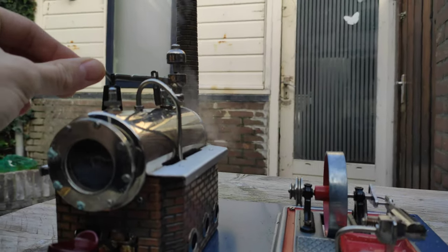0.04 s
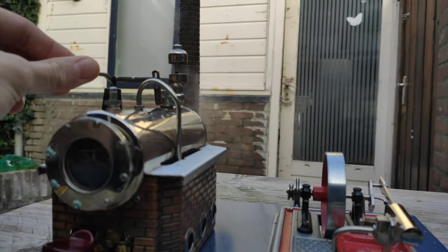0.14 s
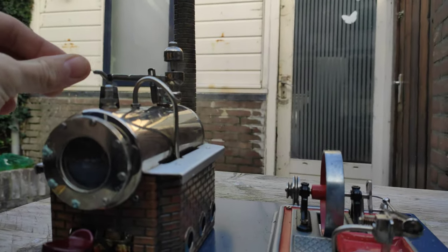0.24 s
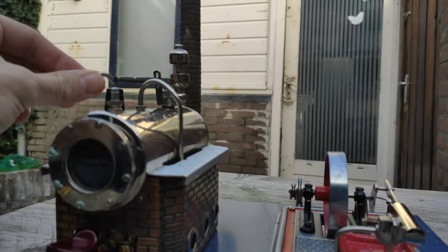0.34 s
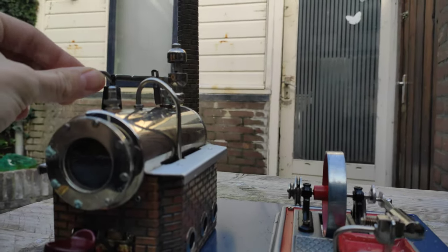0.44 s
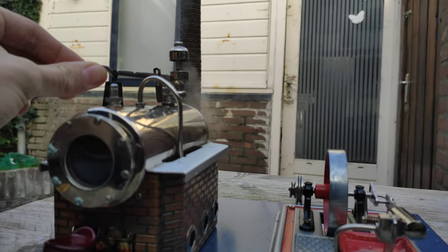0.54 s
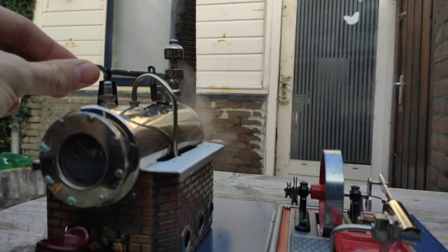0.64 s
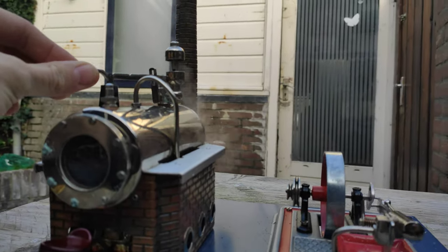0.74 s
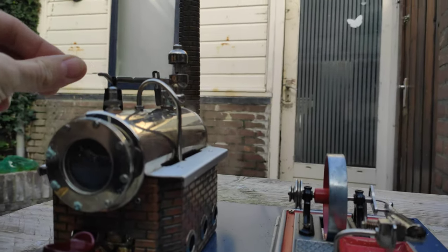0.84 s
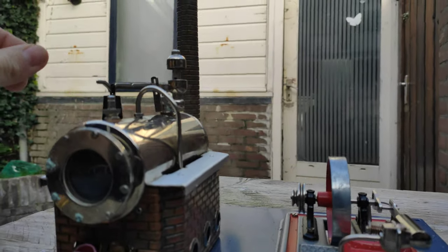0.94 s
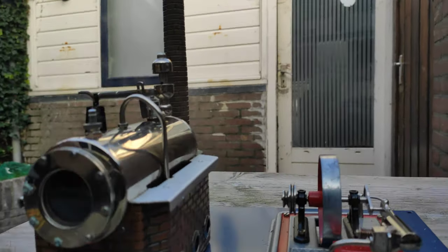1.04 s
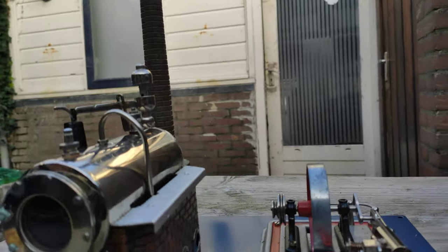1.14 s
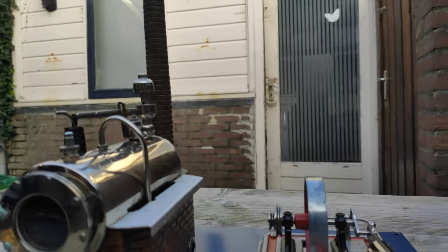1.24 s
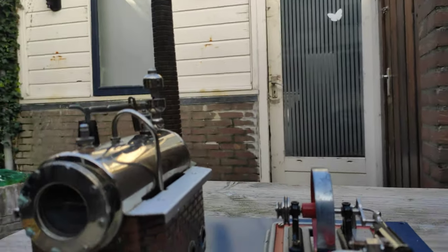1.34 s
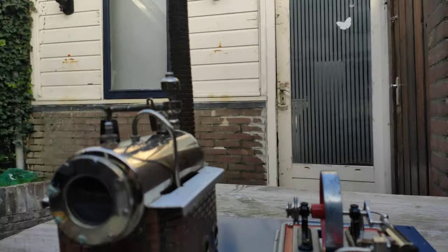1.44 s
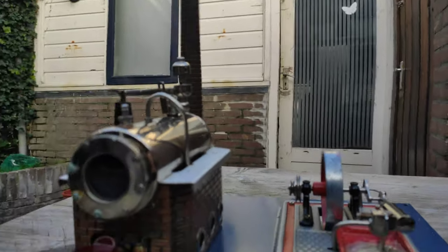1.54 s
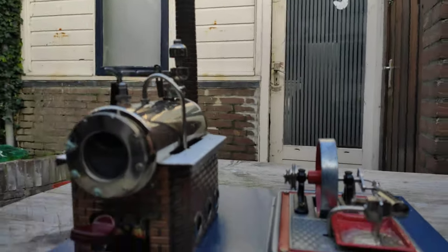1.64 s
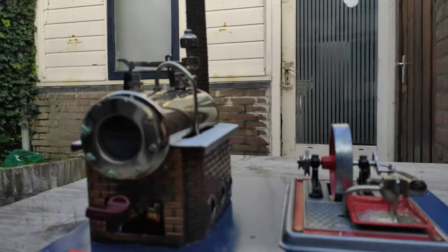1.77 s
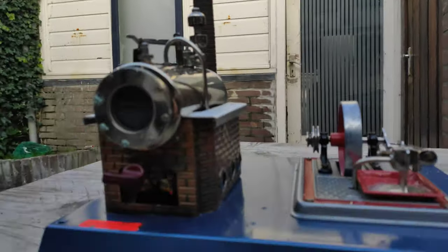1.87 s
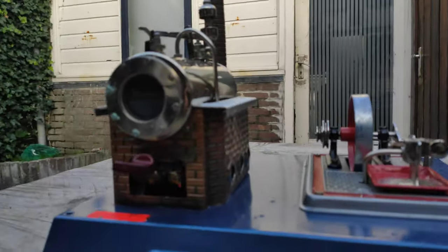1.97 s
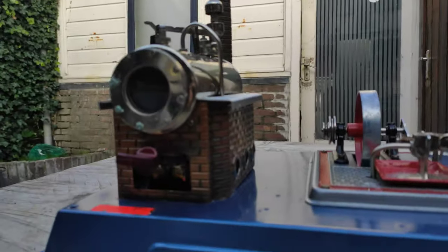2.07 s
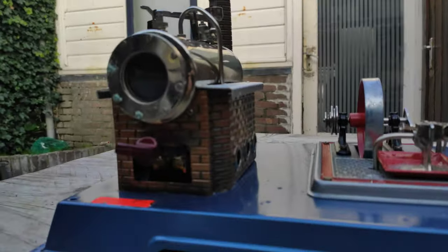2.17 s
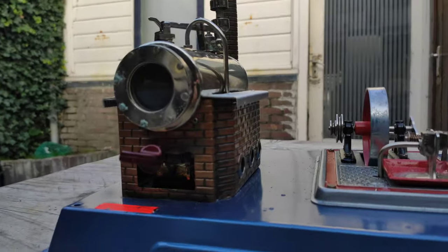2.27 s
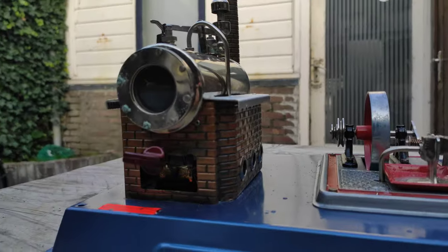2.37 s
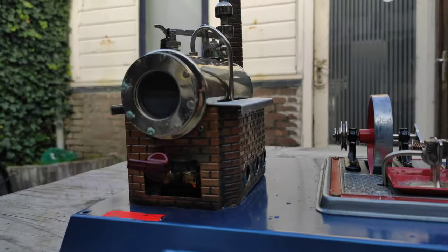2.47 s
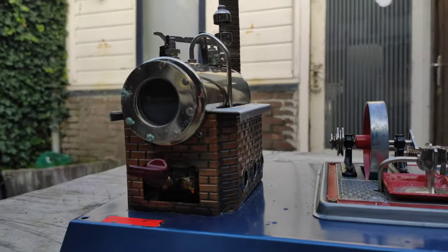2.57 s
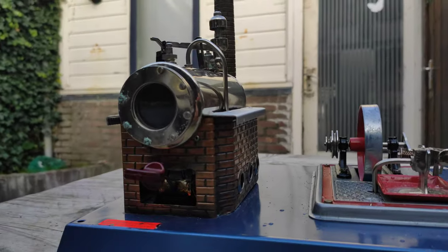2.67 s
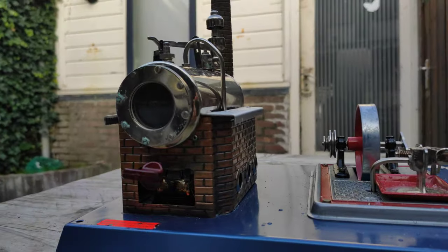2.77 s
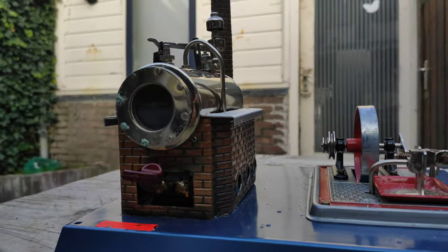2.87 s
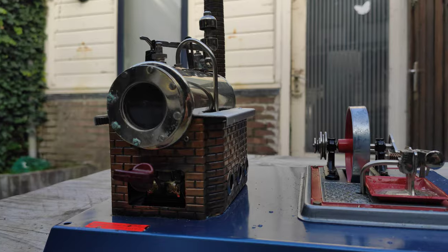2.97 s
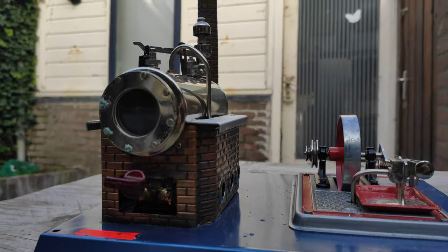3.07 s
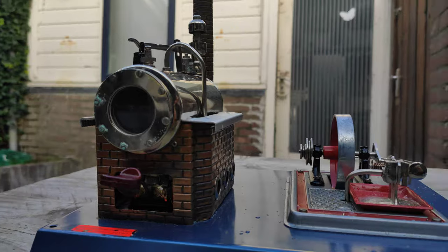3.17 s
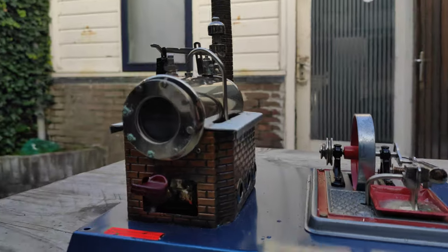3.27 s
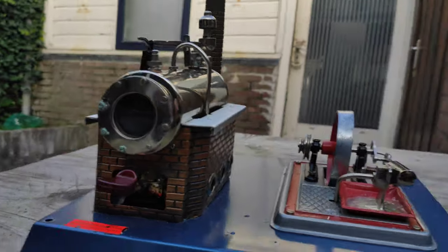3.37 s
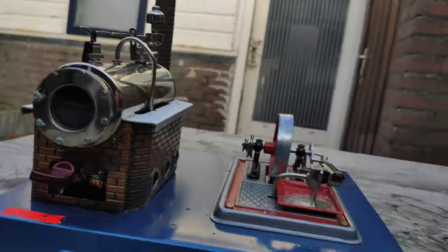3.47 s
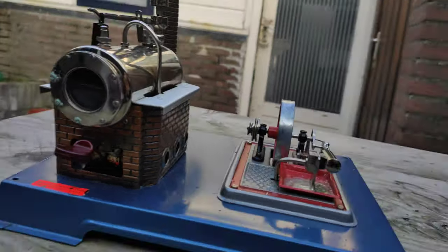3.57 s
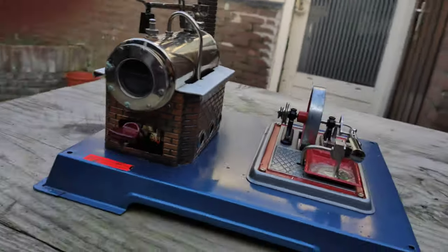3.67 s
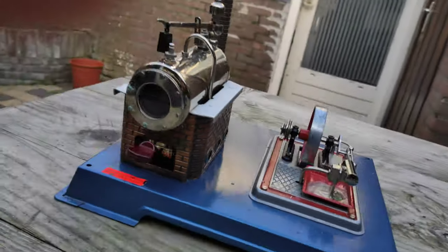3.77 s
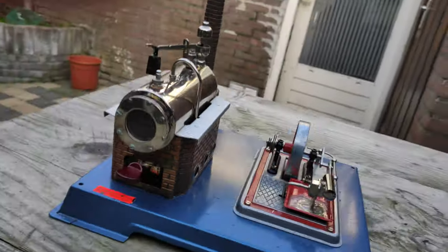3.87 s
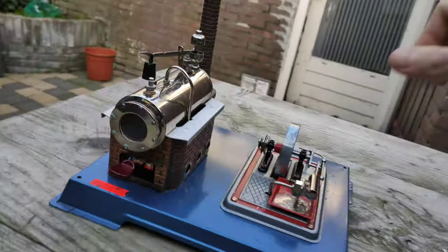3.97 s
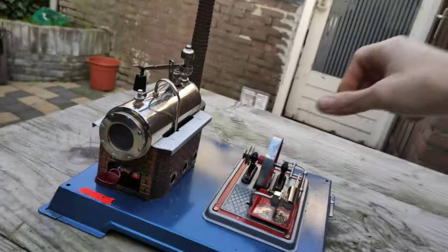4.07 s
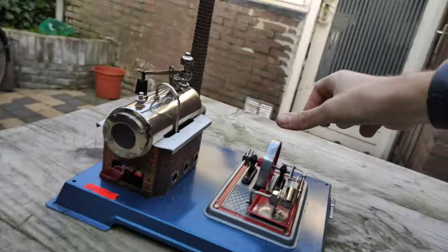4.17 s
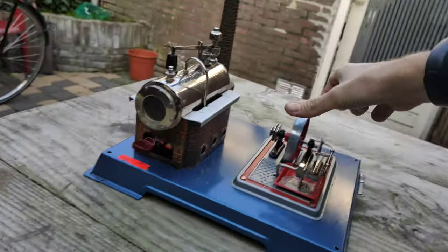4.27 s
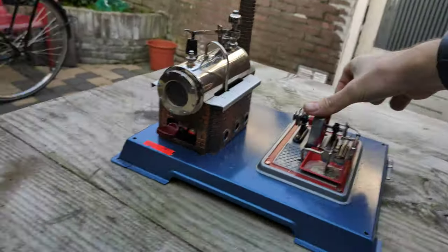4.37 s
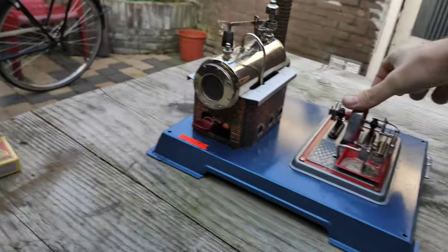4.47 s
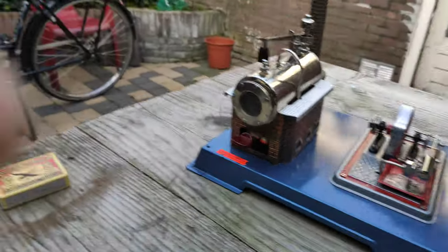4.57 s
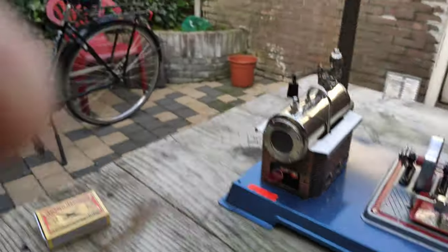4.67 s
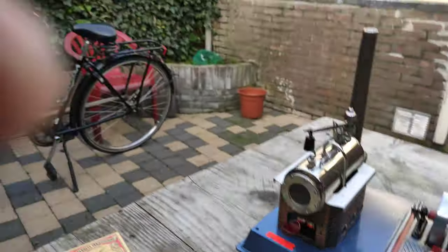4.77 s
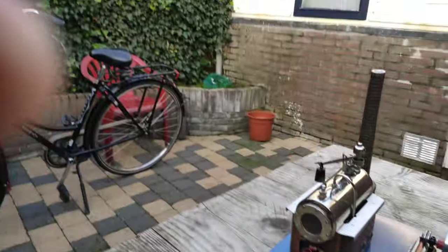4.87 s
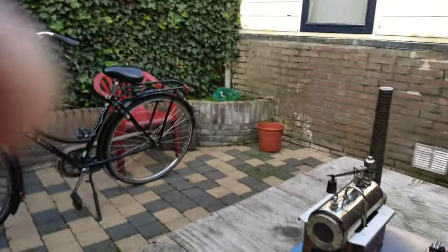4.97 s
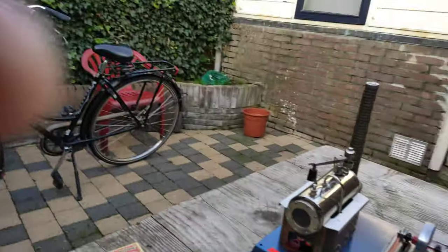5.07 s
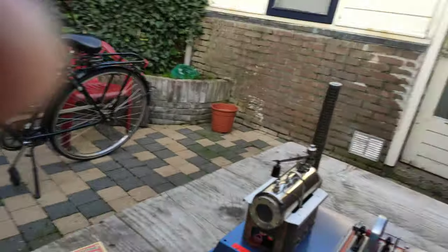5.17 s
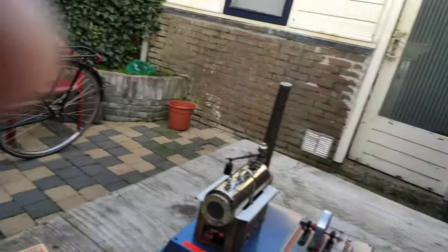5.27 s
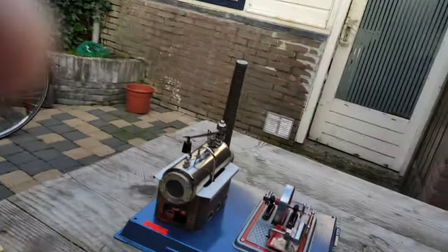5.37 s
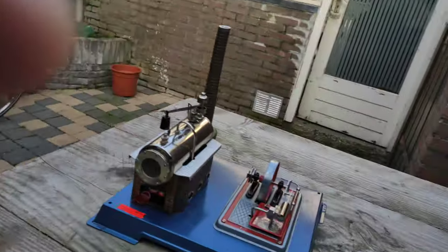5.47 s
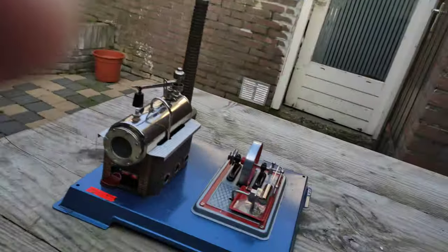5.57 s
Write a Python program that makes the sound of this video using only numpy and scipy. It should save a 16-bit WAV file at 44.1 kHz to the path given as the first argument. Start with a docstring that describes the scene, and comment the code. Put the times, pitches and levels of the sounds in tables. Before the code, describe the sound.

A model steam engine gives two short, high, hissy whistle toots and a faint third while its knocking crank runs down. A lull follows with faint seeping steam, low wind, a distant town and light taps. Fingers briefly rub the hand-held stereo microphone. Then the engine restarts, with quick tinny knocks, valve ticks and spits of steam, echoing slightly in a walled yard.

```python
"""A model steam engine on a garden table in a walled yard, heard by a hand-held stereo microphone.
First a finger pulls the steam whistle twice, then once faintly, while the crank runs down. In the lull,
seeping steam, wind, a distant town and light taps remain. After about 3 s, fingers rub the microphone.
Near 4.4 s the flywheel is flicked, and each turn gives a valve tick, a spit of steam and a knock that
rings the tin base plate."""
import sys
import numpy as np
from scipy import signal
from scipy.fft import rfft, irfft, next_fast_len
from scipy.io import wavfile
from scipy.ndimage import uniform_filter1d

SR = 44100
rng = np.random.default_rng(int(sys.argv[2]) if len(sys.argv) > 2 else 0)


def file_out(sig):
    """Save sig as 16-bit WAV at sys.argv[1]."""
    # one column per channel
    cols = np.atleast_2d(sig).T
    # limit, then scale
    lim = np.clip(cols, -1, 1)
    pcm = np.round(lim * 32767).astype(np.int16)
    wavfile.write(sys.argv[1], SR, pcm)


N = 247401

# "Pan" is left level minus right level. "Fade" is the time taken to fall by 60 dB.
# valve ticks: (time [s], strength [dB])
VALVE_TICKS = [(0.326, -22.5), (0.9016, -25.5), (4.658, -28), (4.7371, -42), (4.762, -26), (4.8645, -38),
               (4.871, -29), (4.9866, -26), (5.0294, -44), (5.1086, -29), (5.239, -25.5), (5.378, -27),
               (5.5263, -31)]
# ringing tones of the valve, base plate and table: (pitch [Hz], level [dB], fade [s])
VALVE_TONES = [(5130, -12.5, .012), (6300, -4, .01), (8500, -2.5, 0.027), (11100, -15.5, 0.013),
               (12660, -12, 0.0087)]
PLATE_TONES = [(365, -5, .11), (450, -9, .06), (555, -4, .12), (663, -4, .07), (750, -2, .1),
               (840, -4, .06), (1040, -7, .06), (1174, -1, .16), (1343, -7, .09), (1505, -9, .06),
               (1745, -5, .05), (1890, -7, .05), (2150, -9, .06), (2330, -11, .06), (2570, -11, .06)]
TABLE_TONES = [(105.5, -1.5, 0.38), (187, -2.5, 0.15), (209.5, -5, 0.22)]
# spits of exhaust steam: (time [s], level [dB], length [s])
STEAM_SPITS = [(0.335, -41, 0.019), (4.55, -42.5, 0.02), (4.663, -36, 0.017), (4.7665, -36.5, 0.023),
               (4.877, -37, 0.014), (4.9905, -38.5, 0.02), (5.1134, -38.5, 0.012), (5.2443, -39, 0.024),
               (5.383, -41, 0.019), (5.53, -37.5, 0.015)]
# crank knocks: (time [s], strength [dB], sharp crack above that [dB])
CRANK_KNOCKS = [(0.094, -33, -9), (0.118, -25.5, -1), (0.36, -25, -1.5), (0.623, -24, -3),
                (0.771, -32.5, -7), (0.917, -42, 0.5), (1.068, -40.5, 0), (4.414, -40, -32),
                (4.568, -26, -10.5), (4.622, -38, -10.5), (4.671, -23.5, -15), (4.734, -44, -14),
                (4.776, -22.5, -13), (4.887, -23.5, -6.5), (5.003, -24, -6.5), (5.126, -25, -3.5),
                (5.257, -24, -6.5), (5.396, -24, -8.5), (5.545, -25, -6)]
# the steam jet, one list for each whistle pull: (time [s], level [dB])
WHISTLE_PULLS = [
    [(0.0, -23.5), (0.014, -28), (0.08, -26.5), (0.1, -29.5), (0.138, -36.5), (0.156, -41.5), (0.2, -86)],
    [(0.47, -57.5), (0.494, -36.5), (0.54, -28), (0.59, -25.5), (0.64, -25.5), (0.68, -31.5), (0.74, -36),
     (0.764, -45), (0.81, -91)],
    [(0.91, -67), (0.932, -40), (0.948, -44), (1.008, -43.5), (1.04, -64)],
]
# each pull's two tones: (start [s], low pitch [Hz], low tone [dB], high tone [dB]), against a full jet
PULL_TONES = [(0, 3680, 2.5, -3), (.3, 3763, 2, -3), (.87, 3730, -23, -23)]
# the whistle's low tone, then its high tone: (width [Hz], delay on the left [radians])
PIPE_TONES = [(380, 2), (1150, 0.43)]
# moments when the low tone sounds clearly: (time [s], level [dB], length [s])
CLEAR_MOMENTS = [(.001, -13.5, 0.0072), (0.045, -12.5, 0.0077), (0.074, -19.5, 0.011), (0.077, -22, 0.014),
                 (0.577, -13.5, 0.012), (0.586, -13.5, 0.011), (0.619, -11.5, 0.0048), (0.629, -19.5, .01),
                 (0.642, -9.5, .004)]
# skin on the microphone or flywheel: (time [s], rise [s], fade starts after [s], fade [s],
# level on the nearer side [dB], rumble above that [dB], treble above that [dB], pan [dB])
SKIN_RUBS = [(3.173, .004, .005, 0.28, -54, 3, -5, -5), (3.232, 0.0044, 0.0054, .06, -44.5, 9.5, -14, -16),
             (3.25, 0.012, 0.051, 0.052, -46, 6, -7, -26), (3.334, 0.011, 0.02, 0.2, -45, 6, -16, -25),
             (3.387, .013, 0.026, 0.069, -22.5, -3.5, -2.5, -38),
             (3.424, 0.0077, 0.015, .1, -46, -18, 11, -20), (3.44, 0.011, 0.053, 0.093, -53, -10, 11, -15),
             (3.685, .008, 0.033, 0.13, -51.5, -5, 3.5, 10), (3.758, .006, 0.0067, 0.24, -58.5, 4, -2, 0),
             (4.269, .003, .084, 0.12, -63.5, 4, -17, 0.5)]
# taps nearby: (time [s], level [dB], pitch [Hz], pan [dB], push above the tail [dB])
LIGHT_TAPS = [(1.068, -43.5, 1760, 8, 10), (1.572, -42.5, 281, 2, -13.5), (2.07, -59, 2180, 9, -6),
              (2.43, -52, 1047, -2, -6), (3.176, -60, 7100, -8, -6), (3.271, -42, 700, -27, 13),
              (3.286, -48, 5000, -15, 0), (3.687, -52.5, 900, 5, 9), (3.995, -46.5, 700, 1, 7),
              (4.279, -55.5, 2500, -8, 2), (4.294, -55, 2200, -5, -6), (4.312, -53, 1970, -8, -6),
              (4.632, -54, 1490, 0, 0), (4.72, -56, 4000, 2, 0), (5.029, -45, 3880, 8, 3)]
# steam seeping from the fittings: (time [s], level [dB], lower hiss above that [dB])
SEEP_LEVELS = [(0, -63, -9), (.85, -61.5, -14), (1.05, -66.5, -4), (1.1, -59.5, -4), (1.3, -63, -7),
               (1.62, -64, -1.5), (1.7, -61.5, 1.5), (1.98, -60, -2), (2.1, -62.5, -6), (2.65, -67, -1),
               (3.15, -65.5, -4.5), (3.64, -61, -5), (3.8, -78, -9), (4.1, -68, -0.5), (4.59, -70, -0.5),
               (5.18, -59.5, -3.5), (5.61, -67.5, -1)]
# whistling pinholes: (pitch [Hz], width [Hz], level against the seeping [dB])
PINHOLES = [(4260, 400, -18.5), (6970, 500, -10), (7830, 250, -18), (12000, 600, -11.5), (14600, 900, -9.5)]
# wind on the microphone: (time [s], level [dB], pan [dB])
GUSTS = [(0.0, -57, -1), (0.15, -46.5, 1), (0.69, -51, 1.5), (1.42, -54.5, -1), (1.61, -48, 0),
         (2.05, -52, -6), (2.31, -49, 3.5), (2.53, -54, -5.5), (3.14, -52.5, 7), (3.25, -45.5, -22.5),
         (3.41, -45.5, 0), (3.59, -48.5, 6), (3.75, -41, 2.5), (4.05, -43.5, 1), (4.23, -51.5, 1.5),
         (4.73, -47, 4), (5.05, -54, 2), (5.61, -52.5, 4)]
# the distant town: (time [s], level [dB])
TOWN_SWELLS = [(0.0, -41.5), (0.25, -53.5), (0.61, -49.5), (1.31, -58), (1.61, -54.5), (4.08, -56.5),
               (4.92, -52.5), (5.61, -52)]
# distant machines: (pitch [Hz], width [Hz], level against the town [dB])
MACHINE_HUMS = [(655, 50, -18), (1020, 90, -19.5)]
# how each noise is spread from bass to treble: (frequency [Hz], level [dB])
SPIT_SPECTRUM = [(290, -13), (500, 1.5), (1960, -8), (3600, -6.5), (5100, -1.5), (5980, -7), (7020, -1.5),
                 (9940, -15), (11800, -11.5), (13100, -8), (16000, -2.5)]
CLATTER_SPECTRUM = [(150, -29), (250, -6.5), (1100, 0), (1500, -5), (1790, 0), (2620, -15), (2810, -12.5),
                    (4910, -13), (5450, -25.5), (8280, -19), (9690, -41), (14000, -86.5), (16000, -19)]
JET_SPECTRUM = [(1500, -38), (2500, -44), (3100, -22), (4500, -20.5), (5600, -10), (6800, -19), (8100, -12),
                (9300, -19.5), (11000, -14.5), (12200, -15), (13300, -15), (14500, -4), (15600, -10.5),
                (16100, -14.5)]
SEEP_SPECTRUM = [(3710, -35), (6300, -1.5), (6870, -1), (8090, 4.5), (9730, -7.5), (11600, -1.5),
                 (13700, -4), (15100, 0), (16000, -4.5)]
TOWN_SPECTRUM = [(35, -27.5), (60, 0.5), (92, -2), (167, -5.5), (618, -19.5), (1000, -19.5), (1190, -21.5),
                 (1620, -23), (2720, -30.5), (4490, -41.5), (6000, -45), (7800, -61), (13200, -120)]

STEP_BACK_S, STEP_BACK_DB = 4, -2.5  # the microphone moves away and the highest treble drops
KNOCK_PAN_DB = 3, -1  # before and after that step
STEAM_PAN_DB, WHISTLE_PAN_DB = 4, 4
HIGH_TONE_HZ, RISE_HZ_PER_S = 4450, 4700
FULL_JET_DB, JET_DELAY_S, JET_ALIKE = -26.5, .00041, .17
YARD_FADE_S, YARD_DB, WHISTLE_ECHO_DB = .35, -16.5, -13
ALIKE_BELOW_HZ, TOP_HZ = 1108, 15760


def engine():
    """Valve, exhaust and crank together, a little duller once the microphone steps back."""
    sound = valve() + exhaust() + crank()
    treble = signal.sosfiltfilt(signal.butter(2, 13000, "highpass", fs=SR, output="sos"), sound)
    return sound + (undb(STEP_BACK_DB) - 1) * treble * (np.arange(N) > STEP_BACK_S * SR)


def crank():
    """Slack in the crank rattles shut, ringing the tin plate and the table."""
    times, db, crack_db = np.transpose(CRANK_KNOCKS)
    pan_db = np.where(times < STEP_BACK_S, *KNOCK_PAN_DB)
    blows = bursts(times, db, pan_db, rise_s=.0055, hold_s=.011, fade_s=.088)
    bounces = undb(4 * wander(600))
    bounces /= uniform_filter1d(bounces, size=500)  # small bounces share one blow
    plate = ring(blows * bounces * band(280, 4700, 1), PLATE_TONES) * undb(-49)
    table = ring(uniform_filter1d(blows, size=600) * band(94, 340, 1), TABLE_TONES) * undb(-63)
    clatter = blows * bounces * noise(CLATTER_SPECTRUM, .98) * undb(-8)
    cracks = bursts(times, db + crack_db, STEAM_PAN_DB, rise_s=.00053, hold_s=.0023, fade_s=.044)
    return plate + table + clatter + cracks * bounces * noise(SPIT_SPECTRUM, .071)


def valve():
    """Each tick is a tiny burst of noise that makes the valve ring."""
    times, db = np.transpose(VALVE_TICKS)
    ticks = bursts(times, db, STEAM_PAN_DB, rise_s=.0005, hold_s=.0025, fade_s=.006)
    ticks *= band(3500, 15000, .2)
    return ring(ticks, VALVE_TONES) * undb(-35.5) + ticks * undb(-15)


def exhaust():
    """The exhaust opens with a pop and spits out steam."""
    times, db, length = np.transpose(STEAM_SPITS)
    pops = bursts(times, db + 2, STEAM_PAN_DB, rise_s=.0015, hold_s=.003, fade_s=.025)
    spits = bursts(times, db, STEAM_PAN_DB, rise_s=.003, hold_s=length, fade_s=.0158)
    return (pops + spits) * undb(.79 * wander(370)) * noise(SPIT_SPECTRUM, 1)


def whistle():
    """A wet steam jet hisses and wakes two breathy tones in a pipe."""
    jet, = curves(WHISTLE_PULLS)
    starts, *settings = np.transpose(PULL_TONES)
    pull = np.searchsorted(starts * SR, np.arange(N), side="right").clip(1) - 1
    low_hz, low_db, high_db = (column[pull] for column in settings)
    # the low tone climbs to its pitch while the jet opens
    peak_s = np.array([max(rows, key=lambda row: row[1])[0] for rows in WHISTLE_PULLS])[pull]
    low_hz = low_hz - RISE_HZ_PER_S * np.clip(peak_s - np.arange(N) / SR, 0, .1)
    # the harder the jet blows, the more the low tone takes over
    force = np.maximum(jet / undb(FULL_JET_DB), .3)
    low = undb(low_db) * force * breathy(low_hz, *PIPE_TONES[0])
    high = undb(high_db) * force ** -.56 * breathy(HIGH_TONE_HZ, *PIPE_TONES[1])
    left, right = noise(JET_SPECTRUM, 0)
    left, right = high + [JET_ALIKE * right + np.sqrt(1 - JET_ALIKE ** 2) * left, right]
    hiss = np.array([np.roll(left, round(JET_DELAY_S * SR)), right])  # reaches the right side first
    times, db, length = np.transpose(CLEAR_MOMENTS)
    flares = bursts(times, db, 0, rise_s=.0055, hold_s=length, fade_s=.029)
    phase = 2 * np.pi * np.cumsum(low_hz + 60 * wander(79.8)) / SR
    clear = flares * np.sin(phase - np.array([[PIPE_TONES[0][1]], [0]]))
    return (jet * (low + hiss) + clear) * sides(WHISTLE_PAN_DB)[:, None]


def rubs():
    """Skin sticks and slips, making grainy noise that is often much louder on one side."""
    times, rise, hold, fade, db, rumble_db, treble_db, pan_db = np.transpose(SKIN_RUBS)

    def press(extra_db):
        return bursts(times, db + extra_db - abs(pan_db) / 2, pan_db, rise, hold, fade)

    grain = undb(2 * wander(300))
    scrape = noise([(1800, -29), (2800, -7), (5500, -1.5), (8200, -.5), (9200, -15.5), (10000, -36)], 0)
    rumble = noise([(60, -6), (200, 1), (2500, -15), (3000, -40)], 0)
    treble = noise([(8500, -14), (10000, -3.5), (13500, 1.5), (16200, -2.5)], 0)
    return grain * (press(0) * scrape + press(rumble_db) * rumble + press(treble_db) * treble)


def taps():
    """Each tap is a short push with a dull tail of noise."""
    out = np.zeros((2, N))
    length, fade_s = SR // 8, .084
    white = rng.standard_normal((2, length))
    white[1] += white[0]  # makes the sides partly alike
    for time, db, hz, pan_db, push_db in LIGHT_TAPS:
        tail = signal.lfilter(*signal.butter(2, [hz * .51, hz * 1.42], "bandpass", fs=SR), white)
        tap = unit(tail) * undb(-60 * np.arange(length) / SR / fade_s)
        push = np.hanning(int(.3 * SR / hz) + 3) ** 3
        tap[:, :len(push)] += undb(push_db) * push
        start = int(time * SR)
        out[:, start:start + length] += undb(db) * sides(pan_db)[:, None] * tap
    return out


def seeping_steam():
    """Steam hisses from the fittings and whistles unsteadily through pinholes."""
    level, lower_db = curves([SEEP_LEVELS])
    leaks = sum(undb(db + 5 * wander(5.1)) * breathy(hz * (1 + .025 * wander(3)), width, 1.7)
                for hz, width, db in PINHOLES)
    lower_hiss = noise([(2200, -22), (3200, -2), (4500, 1), (6000, -3.5), (6800, -20)], .11)
    return level * (noise(SEEP_SPECTRUM, .023) + undb(lower_db) * lower_hiss + leaks)


def wind():
    """Gusts rumble on the microphone's two openings."""
    gust, pan_db = curves([GUSTS])
    rumble = noise([(12, -2), (24, 13.5), (40, 12), (60, 2.5), (90, -11), (160, -35.5)], .4)
    return gust * sides(pan_db) * rumble


def town():
    """A distant town murmurs and its machines hum, both wavering."""
    hums = sum(undb(db + .83 * wander(9.5)) * breathy(hz, width, 0) for hz, width, db in MACHINE_HUMS)
    flicker = undb(wander(18))
    level, = curves([TOWN_SWELLS])
    return level * (noise(TOWN_SPECTRUM, .98) * flicker + hums)


def yard_echo(sound):
    """Brick walls send back a short, blurred echo."""
    t = np.arange(int(YARD_FADE_S * SR)) / SR
    tail = noise([(20, 2.5), (3000, -1.5), (20000, -13)], .9)[:, :len(t)]
    tail *= undb(-60 * t / YARD_FADE_S) * np.minimum(t / .0022, 1)
    tail /= np.sqrt(np.sum(tail ** 2, axis=1, keepdims=True))
    return signal.fftconvolve(sound, tail, axes=1)[:, :N]


def undb(db):
    """Turn decibels into a multiplier."""
    return 10 ** (np.asarray(db) / 20)


def unit(x):
    """Scale to an average power of 1."""
    return x / np.sqrt(np.mean(x ** 2))


def sides(pan_db):
    """Left and right multipliers."""
    return undb(np.array([pan_db, -pan_db]) / 2)


def noise(spectrum, alike):
    """Shaped stereo noise; alike (0 to 1) is how well the two sides match in the bass."""
    hz, db = np.transpose(spectrum)
    size = next_fast_len(N, True)
    freqs = np.maximum(np.arange(size // 2 + 1) * SR / size, 1)
    shape = undb(np.interp(np.log(freqs), np.log(hz), db))
    mid, side = rfft(rng.standard_normal((2, size))) * shape
    match = alike / (1 + (freqs / ALIKE_BELOW_HZ) ** 2)
    mid, side = mid * np.sqrt(1 + match), side * np.sqrt(1 - match)
    return unit(irfft(np.array([mid + side, mid - side]), size)[:, :N])


def band(low_hz, high_hz, alike):
    """Noise mostly between two frequencies."""
    return noise([(low_hz * .75, -30), (low_hz, 0), (high_hz, 0), (high_hz * 1.25, -30)], alike)


def breathy(hz, width_hz, left_lag):
    """A tone driven by noise: the wider, the breathier."""
    pole = np.exp(-np.pi * width_hz / SR)
    drive = rng.standard_normal(N) + 1j * rng.standard_normal(N)
    sway = signal.lfilter([1], np.convolve([1, -pole], [1, -pole]), drive)
    tone = sway * np.exp(2j * np.pi * np.cumsum(hz + np.zeros(N)) / SR)
    return unit(np.array([(tone * np.exp(-1j * left_lag)).real, tone.real]))


def ring(drive, tones):
    """Shake an object so that its tones ring and fade."""
    out = 0
    for hz, db, fade_s in tones:
        pole = np.exp(2j * np.pi * hz / SR - np.log(1000) / (fade_s * SR))
        out = out + undb(db) * signal.lfilter([1], [1, -pole], drive).imag
    return out


def wander(rate_hz):
    """A smooth random wobble."""
    hold = int(SR / rate_hz)
    steps = np.repeat(rng.standard_normal(N // hold + 1), hold)
    return uniform_filter1d(uniform_filter1d(steps, hold), hold)[:N]


def curves(tables):
    """Join timed rows into curves; the first is a multiplier, silent outside the tables."""
    t = np.arange(N) / SR
    times, db, *others = np.transpose(np.vstack(tables))
    on = sum((t >= table[0][0]) & (t <= table[-1][0]) for table in tables).clip(0, 1)
    gain = undb(np.interp(t, times, db)) * uniform_filter1d(1. * on, size=200)
    return [gain] + [np.interp(t, times, column) for column in others]


def bursts(times, levels_db, pans_db, rise_s, hold_s, fade_s):
    """A stereo loudness curve in which each event rises, holds and fades."""
    out = np.zeros((2, N))
    for time, db, pan_db, rise, hold, fade in np.broadcast(times, levels_db, pans_db,
                                                           rise_s, hold_s, fade_s):
        start = int(time * SR)
        t = np.arange(min(N - start, SR // 4)) / SR
        shape = np.minimum(t / rise, 1) * undb(-60 * np.maximum(t - hold, 0) / fade)
        out[:, start:start + len(t)] += np.outer(sides(pan_db), undb(db) * shape)
    return out


def scene():
    """Engine and whistle with their echo, then the small sounds and the background."""
    toots, running = whistle(), engine()
    echo = undb(YARD_DB) * yard_echo(running + undb(WHISTLE_ECHO_DB) * toots)
    return running + toots + echo + taps() + rubs() + wind() + town() + seeping_steam()


def record(dry):
    """Cut off the highest treble."""
    return signal.sosfilt(signal.ellip(10, .2, 70, TOP_HZ, fs=SR, output="sos"), dry)


dry = scene()
out = record(dry)
file_out(out)
```